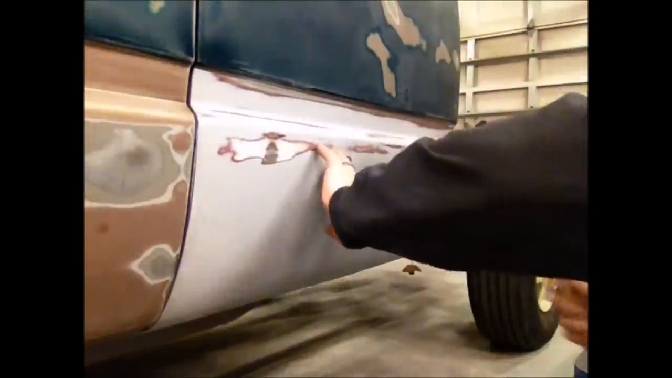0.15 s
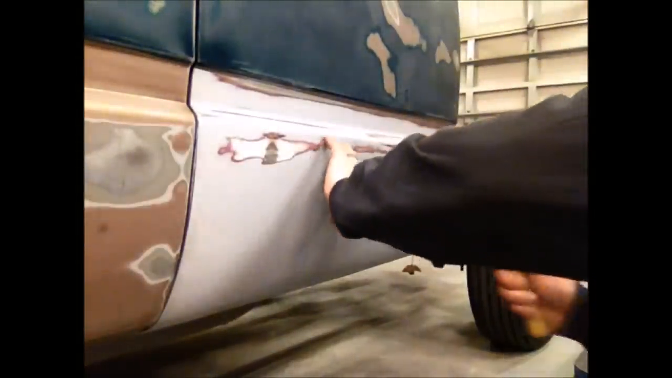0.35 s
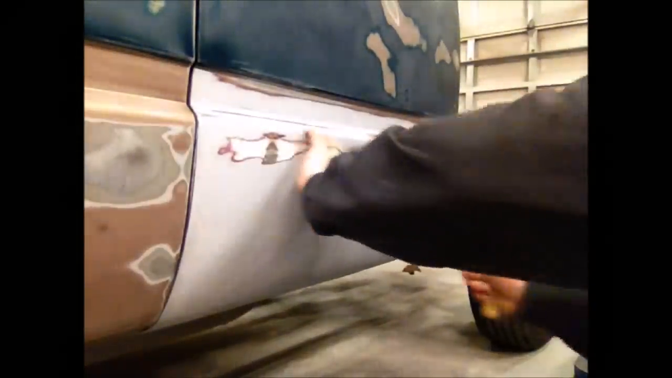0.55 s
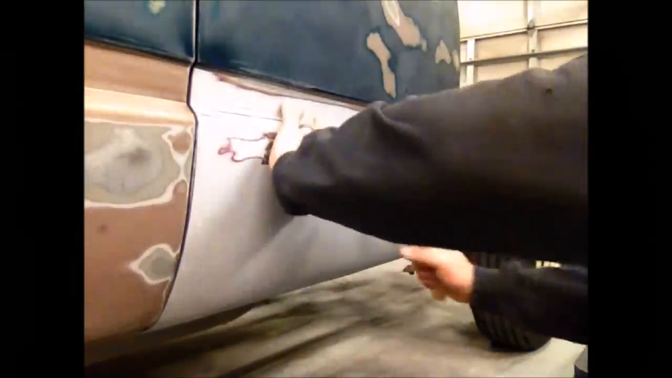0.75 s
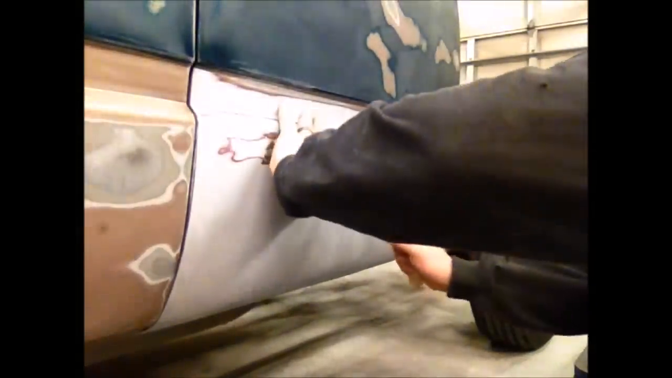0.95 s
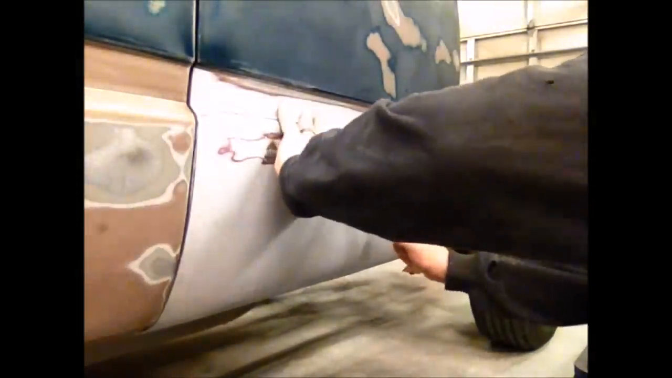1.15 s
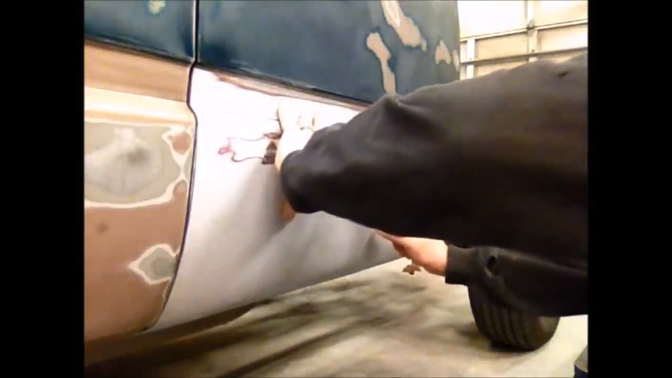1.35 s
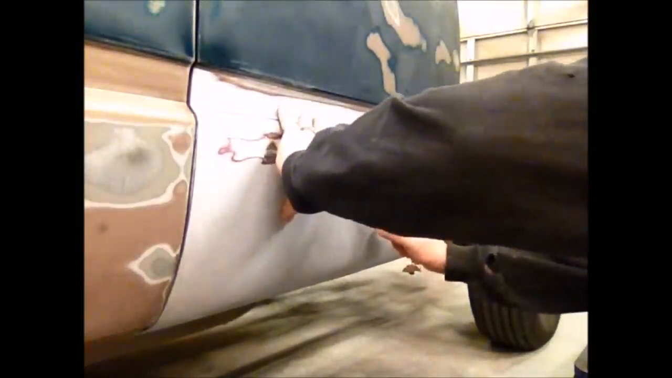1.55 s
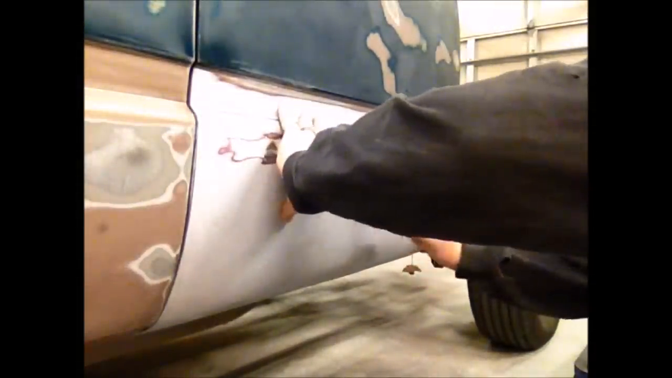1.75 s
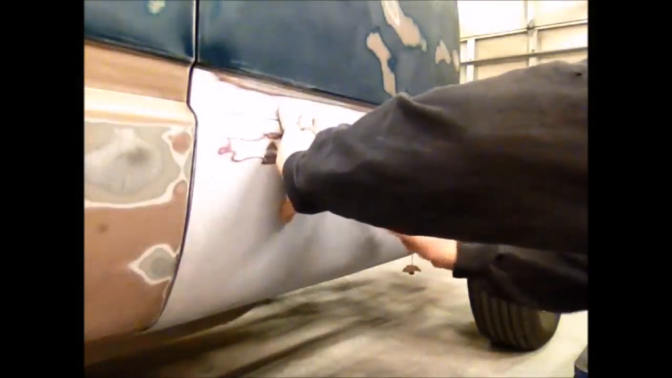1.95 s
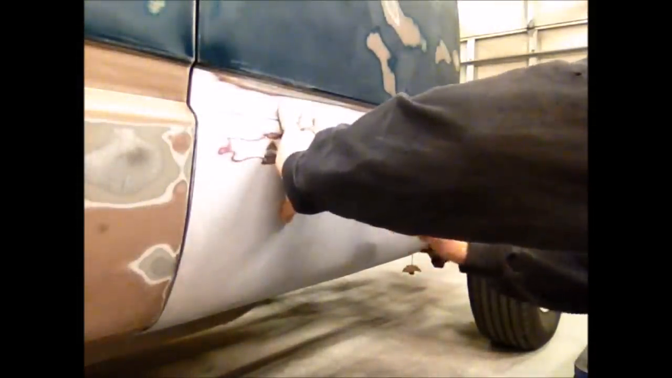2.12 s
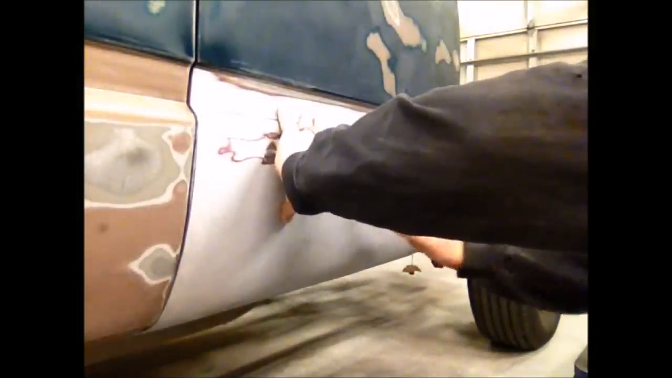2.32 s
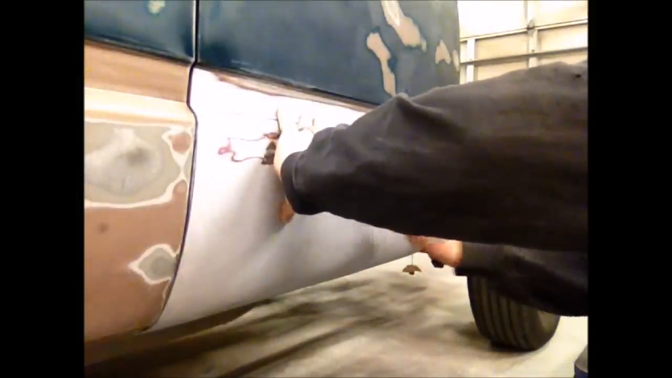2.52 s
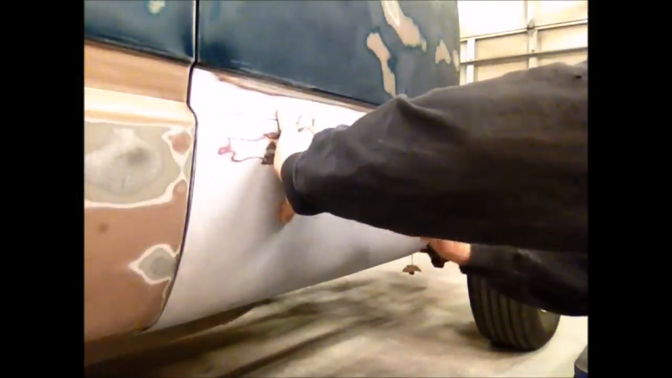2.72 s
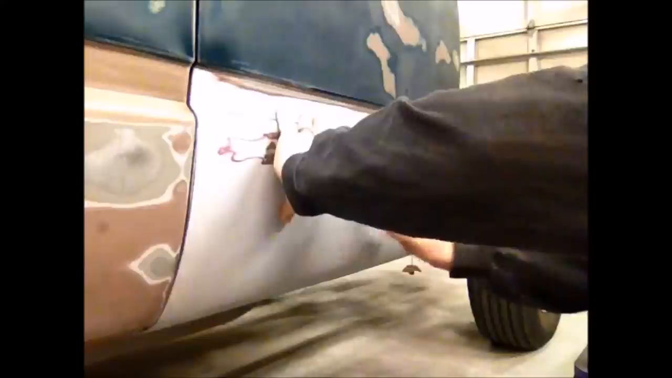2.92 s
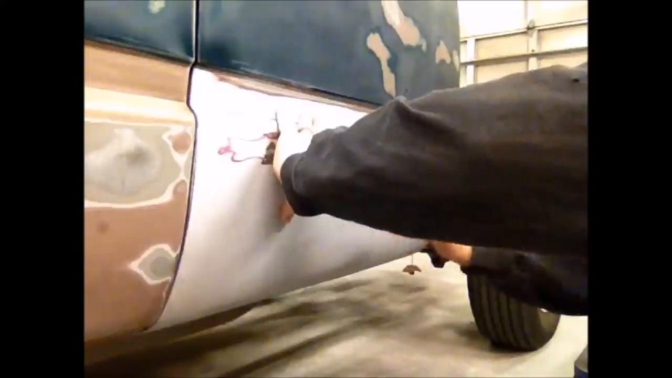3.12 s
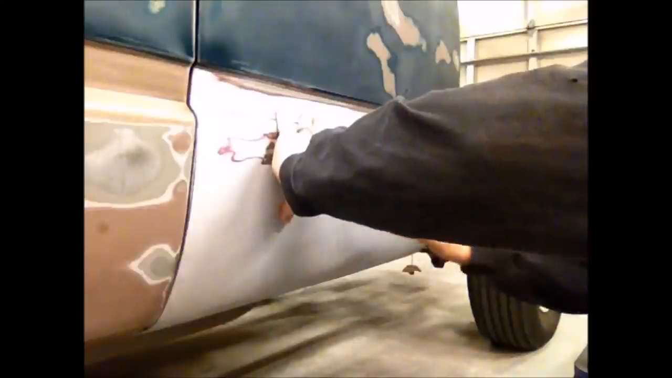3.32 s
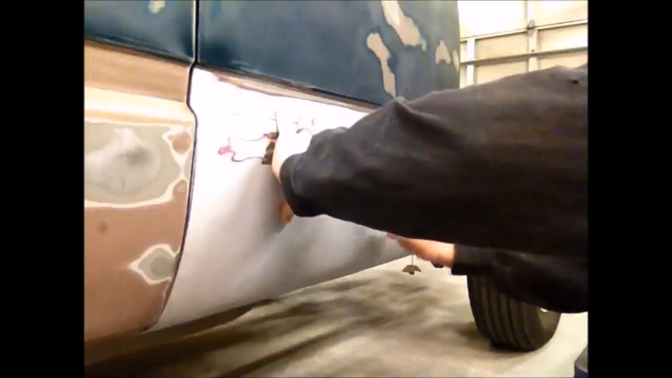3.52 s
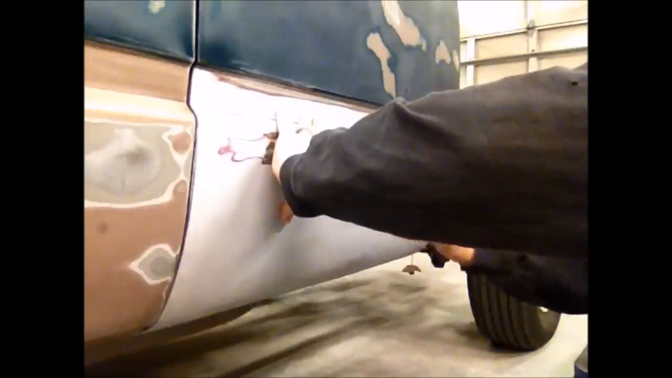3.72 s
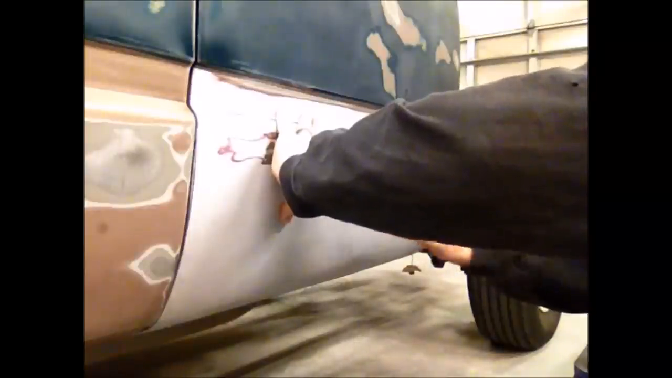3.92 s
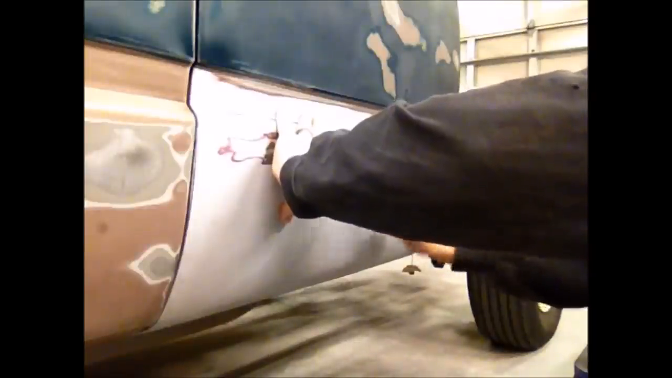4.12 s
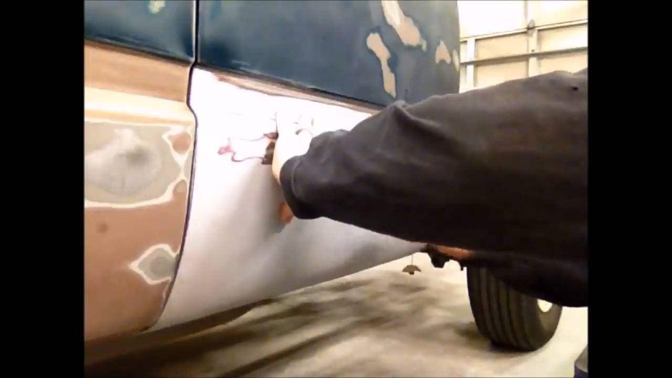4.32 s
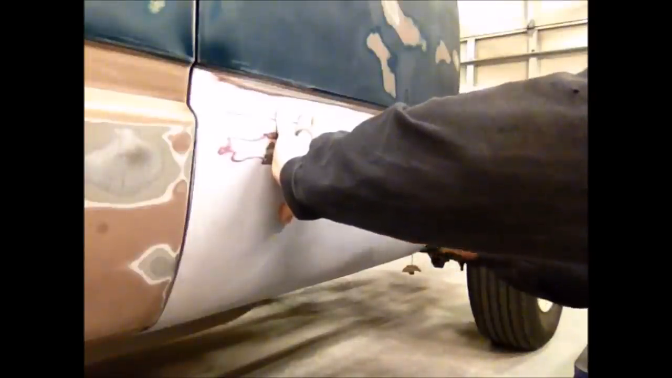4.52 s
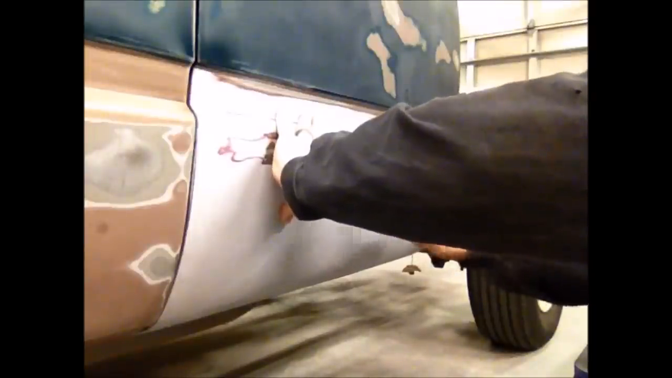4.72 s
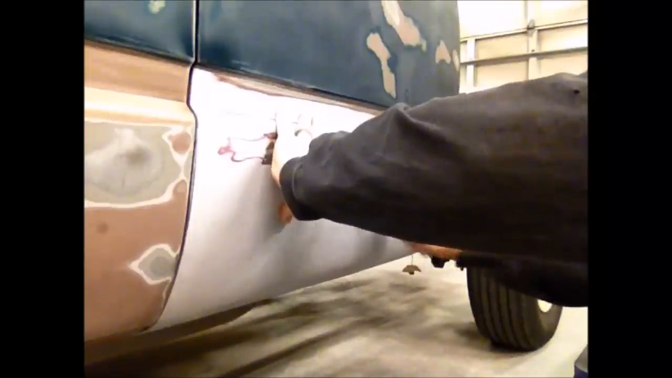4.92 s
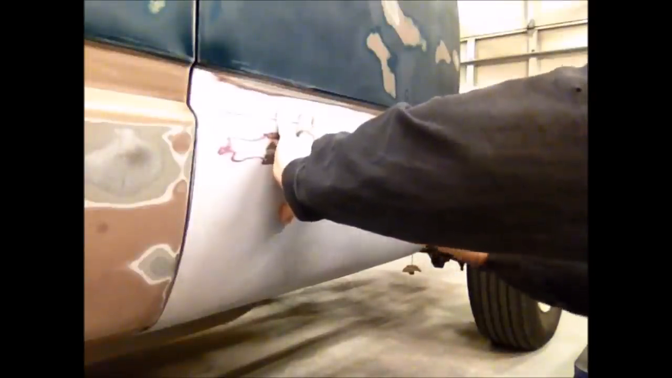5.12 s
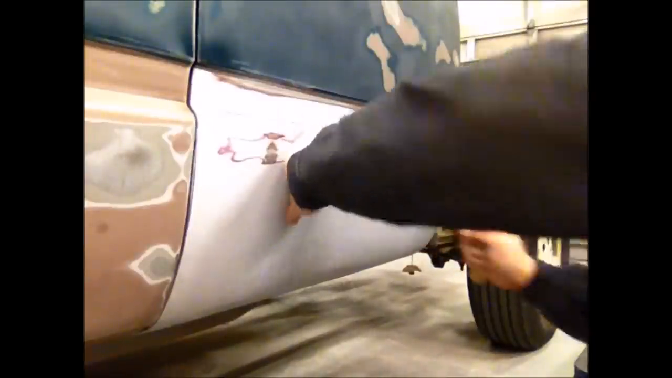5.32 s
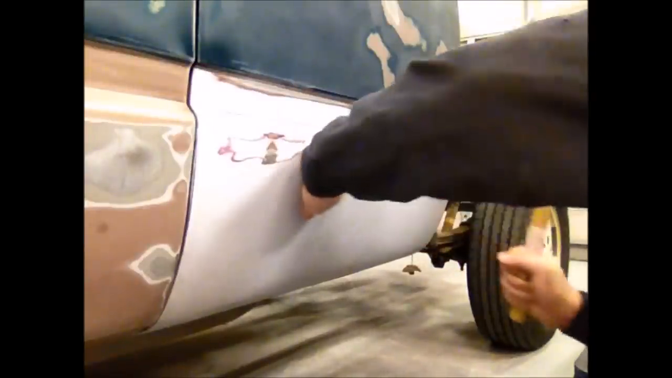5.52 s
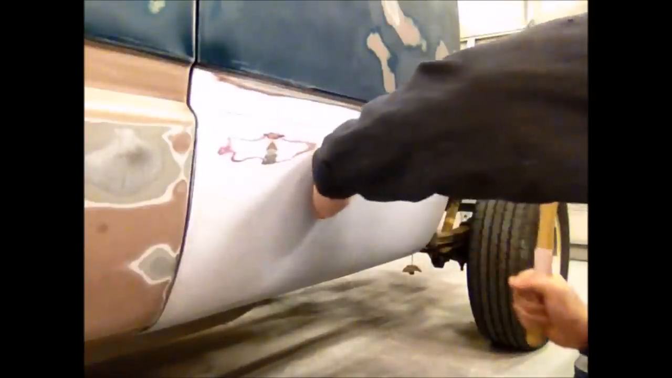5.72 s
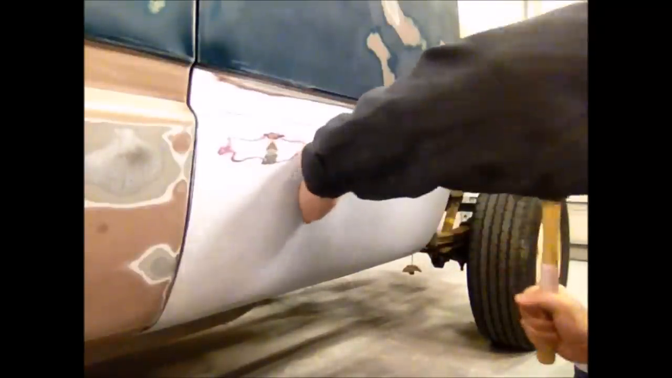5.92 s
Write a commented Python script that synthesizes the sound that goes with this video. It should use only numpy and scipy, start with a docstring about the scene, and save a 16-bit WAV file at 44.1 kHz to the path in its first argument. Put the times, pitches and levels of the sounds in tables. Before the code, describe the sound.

A palm hisses over a steel vehicle panel, a hammer scrapes into place and taps once, then eleven hard booming blows hammer quickly and evenly.

```python
"""A palm hisses over the steel quarter panel of a vehicle in a quiet, faintly humming garage.
Fingertips scuff the paint, a hammer scrapes into place behind the panel and gives one light tap,
then eleven hard blows follow, slightly quickening, and overload the nearby microphone.
Rubbing is shaped noise; each blow adds dying sines, dense bands of ringing noise and a sagging boom."""
import sys
import numpy as np
from scipy import signal
from scipy.fft import rfft, irfft
from scipy.io import wavfile
from scipy.ndimage import uniform_filter1d

SR = 44100
rng = np.random.default_rng(int(sys.argv[2]) if len(sys.argv) > 2 else 0)


def materialize(psi):
    """Save the field psi as 16-bit PCM at rate SR to the path in sys.argv[1].

    A 1-D psi becomes a single channel; in a 2-D psi each row is a channel.
    """
    bounded = np.clip(np.atleast_2d(psi).T, -1, 1)
    quanta = np.round(bounded * 32767).astype(np.int16)
    wavfile.write(sys.argv[1], SR, quanta)


N = 262836
TIME = np.arange(N) / SR  # seconds, whole scene
RING_TIME = np.arange(65536) / SR  # seconds since one blow


def amp(db):
    """Turns decibels into gain."""
    return 10 ** (np.asarray(db) / 20)


def evened(x):
    """Scales a signal to an rms of 1."""
    return x / np.sqrt(np.mean(x ** 2) + 1e-20)


def read(points, hz):
    """Reads a table at any frequency, along a logarithmic pitch axis."""
    table_hz, value = np.transpose(points)
    return np.interp(np.log(hz + 1), np.log(table_hz + 1), value)


def bins(x):
    """Lists the frequencies in a signal's spectrum."""
    return np.fft.rfftfreq(len(x), 1 / SR)


def coloured(x, spectrum):
    """Shapes a signal by a table of Hz and dB, then evens it to rms 1."""
    shaped = rfft(x) * amp(read(spectrum, bins(x)))
    return evened(irfft(shaped, len(x)))


def causal(x, db):
    """Filters by a gain per bin with minimum phase, so that nothing sounds before the blow."""
    mirrored_db = np.r_[db, db[-2:0:-1]]
    log_gain = np.log(amp(mirrored_db))
    response = np.exp(np.conj(signal.hilbert(log_gain)))
    return irfft(rfft(x) * response[:len(db)])


def add(mix, s, sound):
    """Mixes a sound in at a time in seconds, cut off where the scene ends."""
    part = mix[round(s * SR):][:len(sound)]
    part += sound[:len(part)]


def dying(t60):
    """Decays exponentially, by 60 dB in t60 seconds."""
    return np.exp(-np.log(1000) * RING_TIME / t60)


# The colour of the still air in the garage.
# Each row: frequency in Hz, relative level in dB per Hz.
AIR_COLOUR = [(24, -81), (40, -56), (111, -10), (207, -6.5), (241, -6.5), (280, -18.5), (301, -7),
              (522, -7.5), (621, -10), (881, -9.5), (1130, -15.5), (1410, -15), (1770, -21), (15500, -38.5)]
HUM_HZ, HUM_DB = 237, -70
# The room noise is steady, then sinks as the work stops.
AIR_DB, SETTLE_S, SETTLE_DB_PER_S = -61.5, 5.54, 15


def air():
    """Soft room noise with a wavering hum (noise through a narrow peak), and the microphone's own hiss."""
    hum = signal.lfilter(*signal.iirpeak(HUM_HZ, 20, fs=SR), rng.standard_normal(N))
    hiss = amp(-79) * rng.standard_normal(N)
    room_db = AIR_DB - SETTLE_DB_PER_S * np.maximum(TIME - SETTLE_S, 0)
    room = coloured(rng.standard_normal(N), AIR_COLOUR) * amp(room_db)
    return room + amp(HUM_DB) * evened(hum) + hiss


def friction(grain_db):
    """Rubbing is a stream of tiny slips of uneven size: noise whose level wanders."""
    wander = evened(uniform_filter1d(rng.standard_normal(N), size=90))
    return evened(rng.standard_normal(N) * amp(grain_db * wander))


def stroke(s, length, db):
    """The hand speeds up and slows down in one arch, and the hiss follows its speed."""
    return amp(db) * np.cos(np.pi * np.clip((TIME - s) / length, -.5, .5))


# The colour of the palm's hiss.
# Each row: frequency in Hz, relative level in dB per Hz.
PALM_COLOUR = [(900, -21), (1600, 3), (3000, 0), (4200, -2), (7500, 1), (12000, -1.5), (15500, 5)]
# The strokes of the palm over the panel.
# Each row: time in seconds when it is fastest, length in seconds, level in dB before palm() lifts all.
PALM_STROKES = [(.05, 0.49, -72), (.32, 0.4, -64), (0.677, 0.41, -61), (1.0, 0.55, -67), (1.31, .18, -69),
                (5.65, 0.19, -69.5), (5.929, 0.2, -68.5)]


def palm():
    """Skin hisses over the sanded paint, stroke after stroke, louder where the hand is faster."""
    speed = np.sqrt(sum(stroke(*row) ** 2 for row in PALM_STROKES))
    return coloured(friction(grain_db=0.7), PALM_COLOUR) * speed * amp(2.5)


# The garage answering a scrape: level in dB against the scrape, time to die by 60 dB in seconds.
ECHO_DB, ECHO_T60 = -7, .7


def scrape(event, rings, grain_db):
    """Something sliding on the steel presses harder, lets go, and excites resonances that the garage echoes."""
    s, peak_db, swell, fade = event
    slips, out = friction(grain_db), 0
    for hz, width_hz, db in rings:
        resonance = signal.iirpeak(hz, hz / width_hz, fs=SR)
        ringing = signal.lfilter(*resonance, signal.lfilter(*resonance, slips))  # twice, for steeper sides
        out = out + amp(db) * evened(ringing)
    below_peak_db = np.maximum(swell * (s - TIME), fade * (TIME - s))
    direct = evened(out) * amp(peak_db - below_peak_db)
    echo = rng.standard_normal(len(RING_TIME)) * dying(ECHO_T60)
    echo = echo / np.linalg.norm(echo)
    return direct + amp(ECHO_DB) * signal.fftconvolve(direct, echo)[:N]


# Fingertips catching on the paint.
# The one row: time in seconds when hardest, level in dB, swell and fade in dB per second.
SCUFF_PRESS = (.286, -63, 170, 300)
# What they set ringing. Each row: frequency in Hz, width in Hz, relative level in dB.
SCUFF_RESONANCES = [(3150, 1100, -0.56), (4700, 570, -0.93)]


def scuff():
    """Fingertips catch on the paint, in coarse slips."""
    return scrape(SCUFF_PRESS, SCUFF_RESONANCES, grain_db=4)


# The hammer dragged into place.
# The one row: time in seconds when hardest, level in dB, swell and fade in dB per second.
DRAG_PRESS = (1.024, -42.5, 290, 330)
# What it sets ringing. Each row: frequency in Hz, width in Hz, relative level in dB.
DRAG_RESONANCES = [(380, 230, -14.5), (795, 65, 0), (1058, 310, -9), (1390, 260, -10), (2230, 480, -17)]


def drag():
    """The hammer head slides into place behind the panel."""
    return scrape(DRAG_PRESS, DRAG_RESONANCES, grain_db=2)


def mode_pattern(t60, size):
    """Random strengths and phases of countless modes, spread evenly over frequency."""
    noise = rng.standard_normal(len(RING_TIME))
    local_power = uniform_filter1d(abs(rfft(noise * dying(t60))) ** 2, size=size)
    return rfft(noise) / np.sqrt(local_power + 1e-12)


# How alike two blows ring. Each row: frequency in Hz, likeness from 0 to 1.
LIKENESS = [(200, 1), (1000, 0), (3500, 0.95), (10000, 1)]


def dense_ring(bands, pattern, fresh, lowest_hz, rise_s):
    """Countless modes die band by band; every blow repeats the pattern in part, least around 1 kHz."""
    hz = bins(RING_TIME)
    alike = read(LIKENESS, hz)
    modes = np.sqrt(alike) * pattern + np.sqrt(1 - alike) * fresh
    modes = modes * hz ** 4 / (hz ** 4 + lowest_hz ** 4)  # weaker below the lowest modes
    centres, out = [row[0] for row in bands], 0
    # "own" is 1 at this band's centre and 0 at the others, so neighbours crossfade
    for (_, db, t60), own in zip(bands, np.eye(len(bands))):
        fade = dying(t60) * (1 - np.exp(-RING_TIME / rise_s))
        band = irfft(modes * read(np.c_[centres, own], hz)) * fade
        out = out + amp(db) * band * np.linalg.norm(fade) / np.linalg.norm(band)
    return out


def sines(modes, rise_cycles):
    """One dying sine a mode; neighbours swing in opposite directions and build as the bending wave spreads."""
    t, out = RING_TIME, []
    for k, (hz, db, t60) in enumerate(modes):
        rise = 1 - np.exp(-t * hz / rise_cycles)
        out.append((-1) ** k * amp(db) * np.sin(2 * np.pi * hz * t) * dying(t60) * rise)
    return np.array(out)


# The whole sheet bulging: pitch at rest, its rise when a 0 dB blow stretches the steel, time to sag.
BULGE_HZ, STRETCH_HZ, SAG_S = 229.5, 82.5, .072
BULGE_DB, BULGE_T60 = -18.5, 0.66  # level before the blow's force, seconds to die by 60 dB
# The bulge trades energy with the skin around it and throbs.
# The one row: beats per second, depth from 0 to 1, time of a swell in seconds after the blow.
BULGE_THROB = (12, 0.8, 0.095)


def bulge(force_db, rise_s):
    """A hard blow stretches the sheet, so its boom starts sharp and sags, throbbing, back to the pitch at rest."""
    t, (beats, depth, swell_s) = RING_TIME, BULGE_THROB
    hz = BULGE_HZ + STRETCH_HZ * amp(force_db / 2) * np.exp(-t / SAG_S)
    throb = 1 + depth * np.cos(2 * np.pi * beats * (t - swell_s))
    boom = np.sin(2 * np.pi * np.cumsum(hz) / SR)
    return amp(BULGE_DB) * boom * throb * dying(BULGE_T60) * (1 - np.exp(-t / rise_s))


# The clang of a squarely landed blow. Each row: frequency in Hz, share of the extra clang dB.
CLANG_SHARE = [(650, 0), (1250, 0.5), (2400, 0.17), (4200, 1), (6500, 0)]
# A slack spot thuds and, higher up, knocks. Each row: frequency in Hz, share of the extra thud dB.
THUD_SHARE = [(135, 0), (158, .5), (172, 1), (190, .9), (235, 0)]
KNOCK_SHARE = [(380, 0), (490, 0.29), (680, 0)]
# The sheet pushes little air below its lowest mode. Each row: frequency in Hz, gain in dB.
AIR_PUSH = [(70, -6), (115, 1.5), (165, 1.5), (210, 0)]
# A softer blow stays longer on the steel: frequency above which a full blow is dulled,
# and the power of force by which that falls.
CONTACT_HZ, CONTACT_POWER = 23500, 1.42


def blow_colour(hz, force_db, clang_db, thud_db):
    """Where and how hard the hammer lands sets the balance of treble, clang and thud, in dB."""
    contact_hz = CONTACT_HZ * amp(CONTACT_POWER * min(force_db, 0))
    dull_db = 25 * np.log10(1 + (hz / contact_hz) ** 2)  # a longer contact leaves out the treble
    clang = clang_db * read(CLANG_SHARE, hz)
    thud = thud_db * (read(THUD_SHARE, hz) + read(KNOCK_SHARE, hz))
    return clang + thud + read(AIR_PUSH, hz) - dull_db


# The blows. Each row: start in seconds, force in dB, extra clang in dB, extra thud in dB.
HAMMER_BLOWS = [(1.4728, -14, -2.5, 10.5), (1.971, -0.5, 2.5, 3), (2.3224, -0.5, -2, 3.5),
                (2.6563, 1, -2.5, 2.5), (2.9767, 1, -2, 0.5), (3.2970, -0.5, -2.5, -1),
                (3.602, 0.5, 1.5, -2.5), (3.9017, 0.5, 3, -3), (4.1855, 0, -2.5, -1),
                (4.4621, 0.5, 2.5, -4), (4.743, 0, 2, -3), (5.0178, 1.5, -2.5, -2)]
# Next four, each row: frequency in Hz, starting level in dB before the blow's own changes,
# time to die by 60 dB in seconds.
# The strong modes of the panel.
PANEL_MODES = [(118, -58, 3.5), (124, -21, .25), (146, -15, .2), (169, -19, .34), (203, -20, .22),
               (233, -25, .55), (277, -17, .36), (310, -16, .14), (365, -24, .3), (386, -25, .3),
               (422, -22, .48), (448, -24, .2), (502, -17, .18), (539, -23, .34), (597, -22, .2),
               (620, -23, .15), (741, -30, .3), (802, -25, .5), (951, -33, .52), (1033, -22, .26),
               (1111, -28, .52), (1150, -22, .12), (1255, -22, .12), (1321, -20, .28), (1382, -23, .2),
               (1520, -24, .1), (1605, -23, .09), (1814, -23, .19), (2035, -26, .16), (2335, -25, .16)]
# The short clink of the hammer head.
HEAD_MODES = [(2671, -34.5, 0.033), (3707, -29.5, 0.14), (4750, -21, 0.087), (4914, -23, 0.041),
              (5760, -26, 0.018), (6960, -27.5, .04)]
# The crowd of fast-dying modes around the struck spot.
CRASH_BANDS = [(45.4, -53.5, 0.27), (298, -18, 0.34), (596, -22.5, 0.16), (1510, -14.5, 0.081),
               (2120, -18, 0.075), (3070, -27, 0.14), (4800, -18.5, 0.033), (5740, -25, 0.092),
               (7900, -18.5, 0.045), (14200, -18, .06)]
# The hollow body and the garage ringing on.
GARAGE_BANDS = [(158, -30, 0.4), (267, -22, 0.54), (450, -23, 0.66), (810, -27, 0.69), (1330, -28.5, 0.77),
                (2240, -28, 0.65), (3700, -33.5, 0.6), (5530, -38.5, 0.65), (8490, -33.5, 0.41),
                (14180, -32, 0.25)]


def hammer(modes_db, spot_db, spread):
    """Each blow lands on a slightly different spot and so weights the same modes a little differently."""
    hz, out = bins(RING_TIME), np.zeros(N)
    modes = sines(PANEL_MODES + HEAD_MODES, rise_cycles=0.14)
    steel, room = mode_pattern(.15, size=160), mode_pattern(.6, size=50)
    for s, force_db, clang_db, thud_db in HAMMER_BLOWS:
        new_steel, new_room = mode_pattern(.15, size=160), mode_pattern(.6, size=50)
        weights_db = modes_db + spot_db * rng.standard_normal(len(modes))
        ring = amp(weights_db) @ modes
        crash = dense_ring(CRASH_BANDS, steel, new_steel, lowest_hz=14, rise_s=0.00081)
        tail = dense_ring(GARAGE_BANDS, room, new_room, lowest_hz=119, rise_s=0.0085)
        # the harder the blow, the more the sheet bulges and the more of the body it shakes
        boom = amp(force_db / 2) * bulge(force_db, rise_s=0.0043)
        body = boom + amp(spread * force_db) * tail
        colour_db = blow_colour(hz, force_db, clang_db, thud_db)
        add(out, s, causal(ring + crash + body, force_db + colour_db))
    return out


def scene():
    """All sources meet at one microphone."""
    blows = hammer(modes_db=-1.5, spot_db=1.58, spread=0.11)
    return (air() + palm() + scuff() + drag() + blows)[None]


EDGE_HZ = 15350  # the treble ends here


def record(dry, ceiling=1.6):
    """Overload squashes the biggest swings towards a ceiling; then a low-pass filter limits the band."""
    squashed = dry / (1 + abs(dry / ceiling) ** 6) ** (1 / 6)
    lowpass = signal.firwin(511, EDGE_HZ, window=("kaiser", 8), fs=SR)
    return signal.oaconvolve(squashed, lowpass[None], "same")


dry = scene()
out = record(dry)
materialize(out)
```